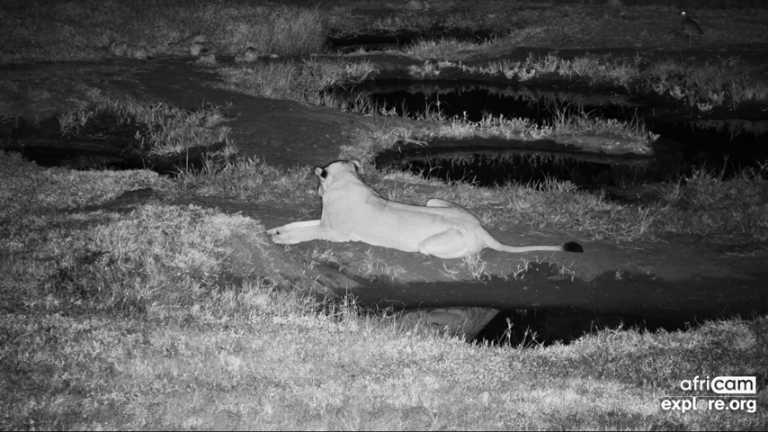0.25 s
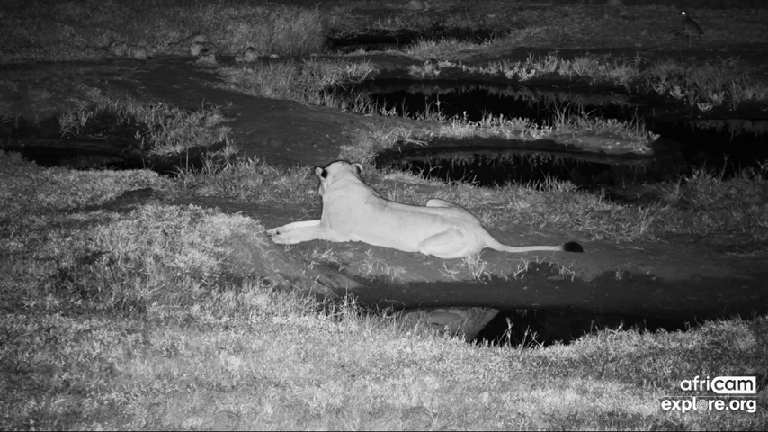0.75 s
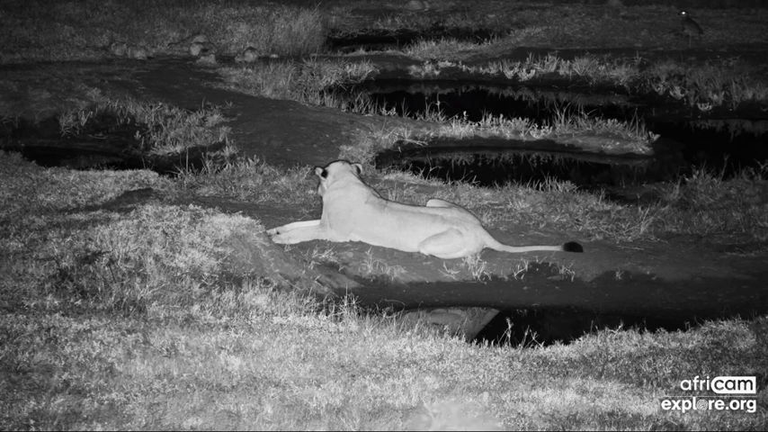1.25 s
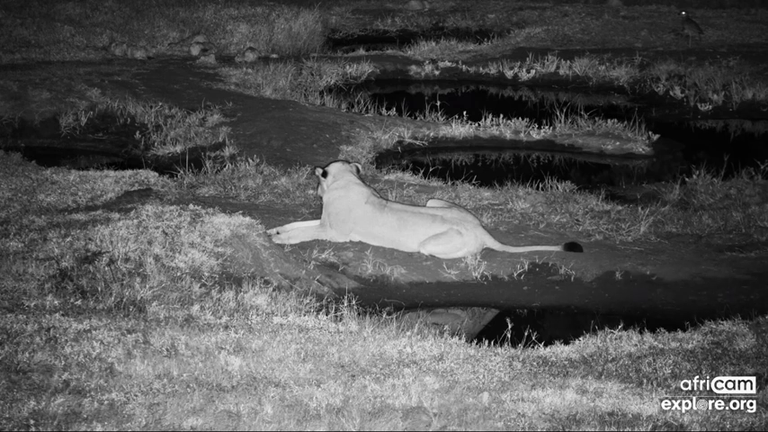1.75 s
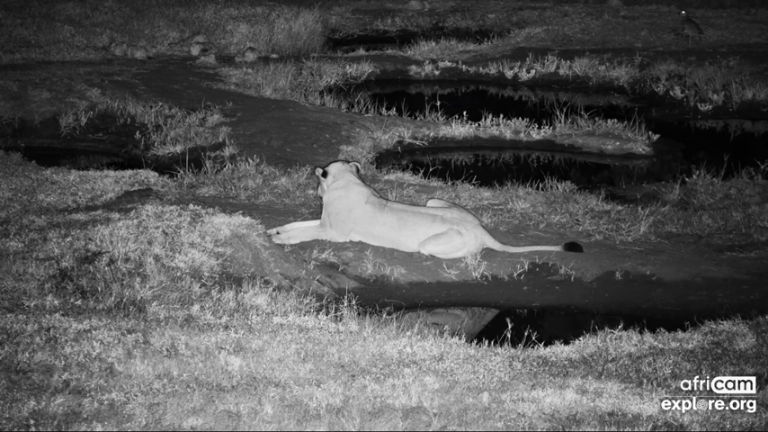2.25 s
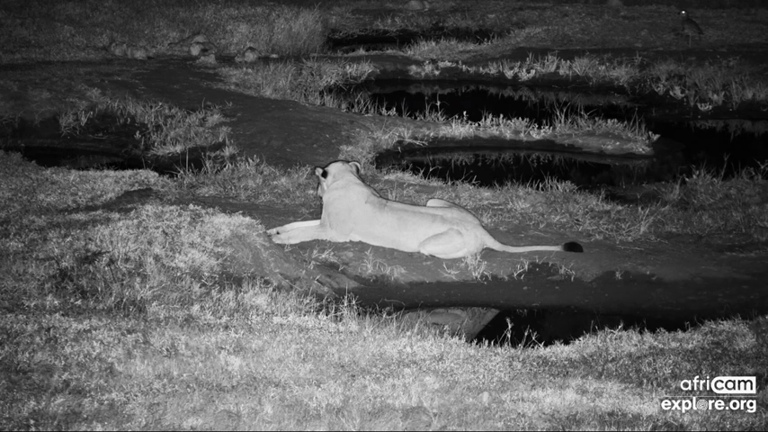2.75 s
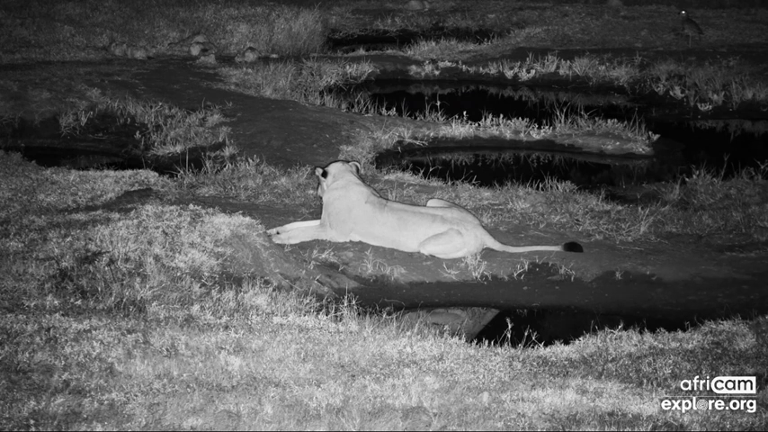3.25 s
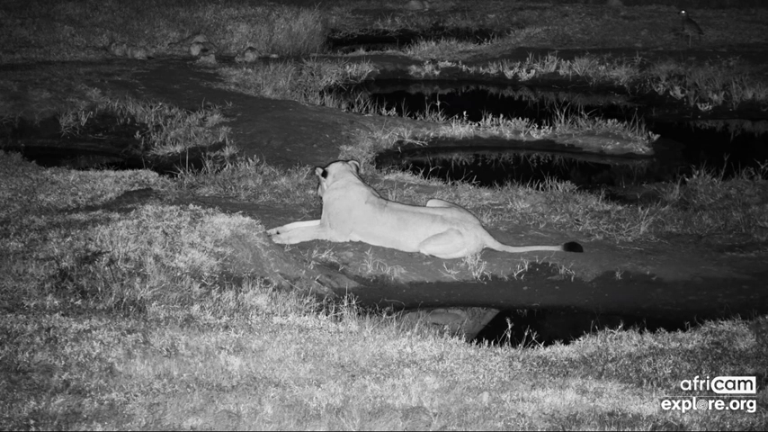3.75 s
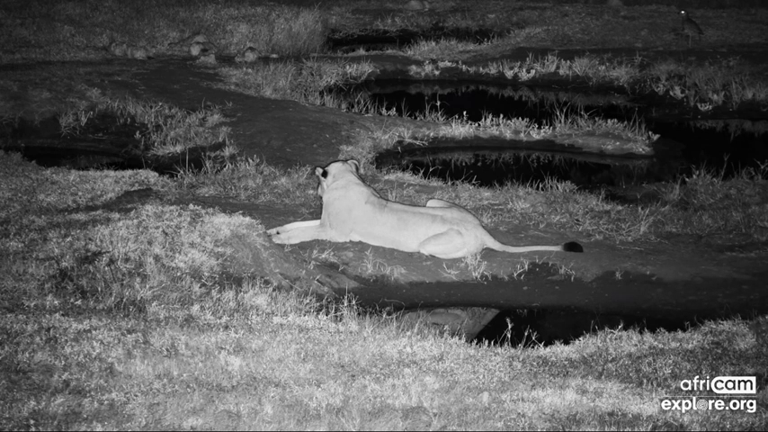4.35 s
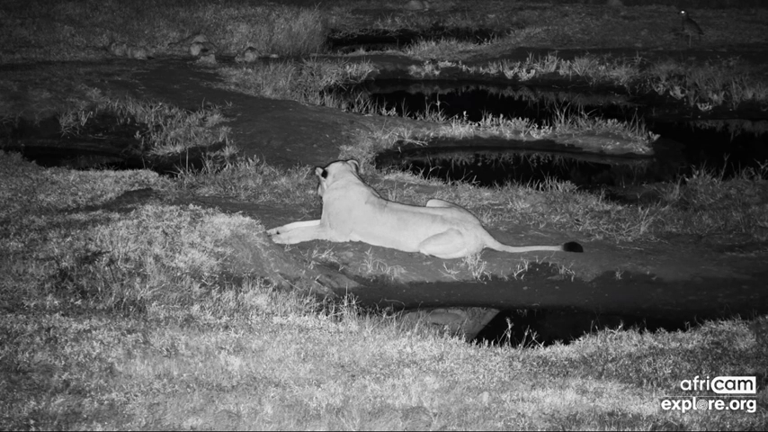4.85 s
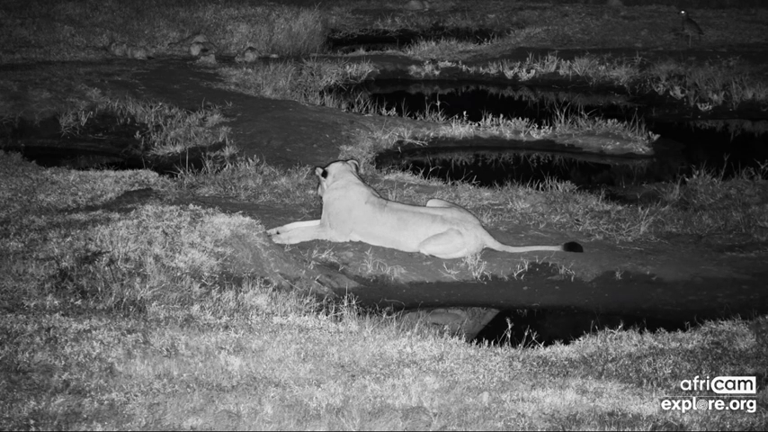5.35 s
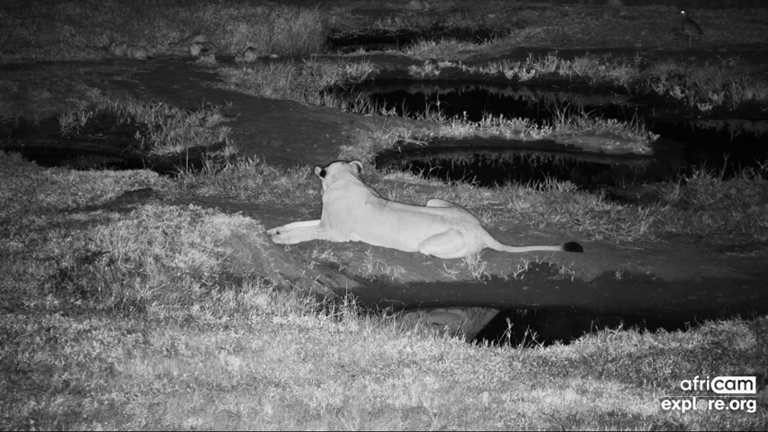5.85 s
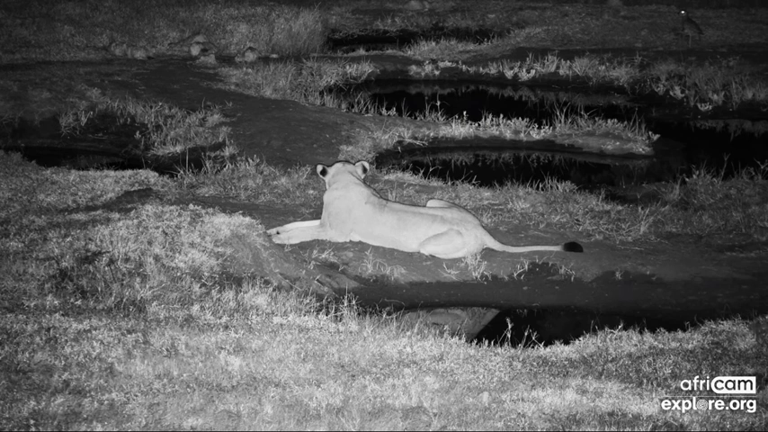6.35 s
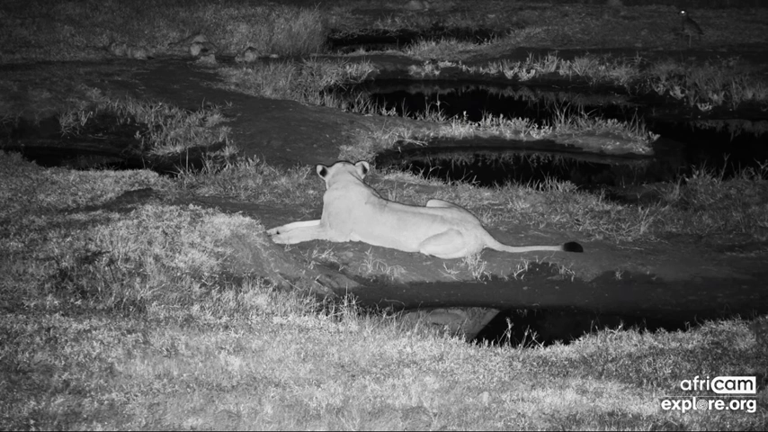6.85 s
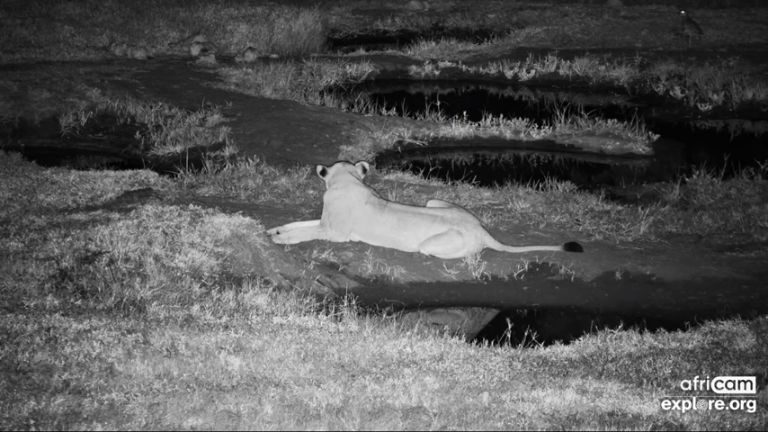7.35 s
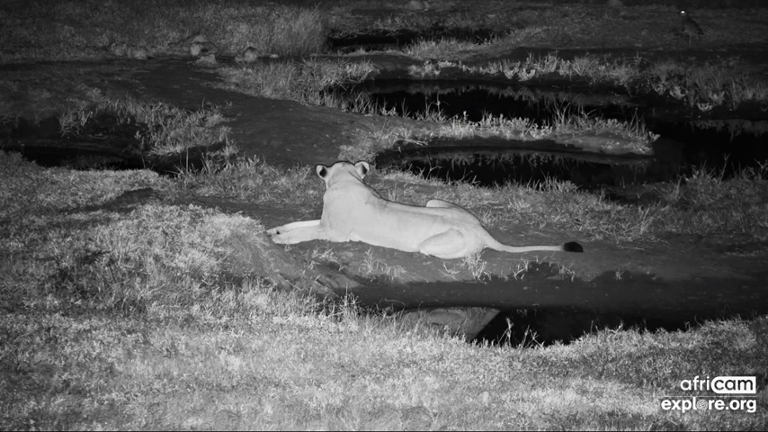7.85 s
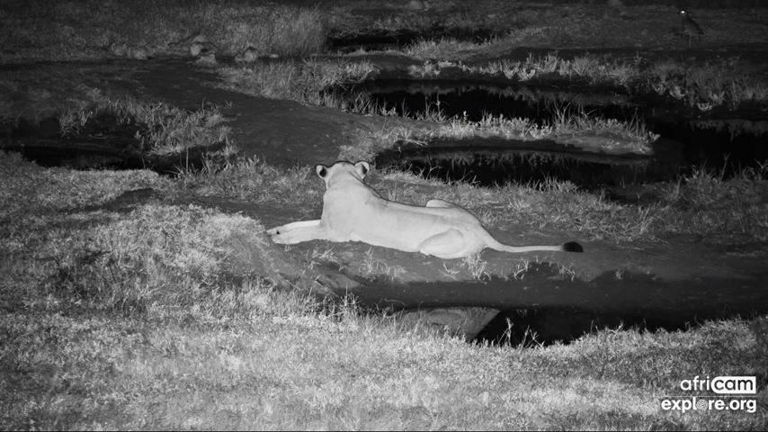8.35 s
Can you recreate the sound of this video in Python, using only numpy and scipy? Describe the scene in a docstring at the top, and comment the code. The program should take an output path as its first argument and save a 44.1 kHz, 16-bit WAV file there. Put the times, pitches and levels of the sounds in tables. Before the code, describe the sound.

A continuous outdoor night chorus: shimmering cricket trills, a low mole cricket buzz and blurred distant frogs, all steady and high. Close by, a cricket repeats little clusters of falling chirps, two or three clusters a second. Over it a reed frog gives five bright upward peeps, far louder than the rest, smeared lightly by reflections. Faint damped clicks and a single soft whoop answer. Fixed microphone, open wet ground, slight hiss and hum, no lion sound.

```python
"""Night at a waterhole, heard by one fixed microphone. A near cricket chirps in threes and fours from the start,
falling sine strokes blurred by reflections; a near reed frog gives five loud rising sine whistles with bank echoes.
Other frogs join with short damped clicks, and with the third whistle comes one bubbling whoop.
A lower cricket strokes in faint bouts. All through, reflected far frogs and crickets, trills and a mole cricket
blend into a high drone over shaped noise and a faint electric hum of steady sines."""
import sys
import numpy as np
from scipy import signal
from scipy.fft import rfft, irfft, next_fast_len
from scipy.io import wavfile

SR = 44100
rng = np.random.default_rng(int(sys.argv[2]) if len(sys.argv) > 2 else 0)


def pcm_store(signal):
    """Save signal as 16-bit PCM."""
    levels = np.round(np.clip(np.atleast_2d(signal), -1, 1) * 32767)
    wavfile.write(sys.argv[1], SR, levels.astype(np.int16).T)


N = 379701
T = np.arange(N) / SR


def undb(db):
    """Decibels to gain."""
    return 10 ** (np.asarray(db) / 20)


def level(x, db):
    """Set the rms level."""
    return x * undb(db) / np.sqrt(np.mean(x ** 2))


def tone(hz):
    """A sine that follows a pitch curve from a random starting phase."""
    cycles = np.cumsum(hz) / SR
    return np.sin(2 * np.pi * (cycles + rng.random()))


def ramp(u):
    """A smooth step from 0 to 1 as u goes from 0 to 1."""
    return np.sin(np.pi / 2 * np.clip(u, 0, 1)) ** 2


def walk(rate, size=N):
    """Smooth random wandering with a spread near 1: noise rolled off above about `rate` Hz."""
    padded = next_fast_len(size)
    spectrum = rfft(rng.standard_normal(padded))
    hz = np.arange(len(spectrum)) * SR / padded
    smooth = irfft(spectrum / (1 + (hz / rate) ** 4), padded)
    return level(smooth[:size], 0)


def add(out, s, sound):
    """Mix a sound in from time s on, cut at the ends of the scene."""
    start = int(s * SR)
    first, last = max(start, 0), min(start + len(sound), N)
    if last > first:
        out[first:last] += sound[first - start:last - start]


def scatter(x, t60):
    """Diffuse reflections: a decaying noise tail of unit energy, falling 60 dB in t60 seconds."""
    t = T[:SR]
    tail = rng.standard_normal(SR) * np.exp(-np.log(1000) * t / t60)
    return signal.fftconvolve(x, tail / np.linalg.norm(tail))[:N]


def whistle(swell_s, fade_s, shift_hz, noise_share, pace=1):
    """One rising note of a reed frog; the vocal sac swells to a peak and closes. A higher pace shortens it."""
    top_hz, climb_hz_per_s, levels_off_s, knee_hz = 3272, 8620, 0.0062, 62.6
    open_s, close_s = 0.026, 0.024
    crest_db, crest_s = 8, 0.014
    flutter_db, soft_flutter_db = 1.25, 1.5
    # time 0 is the loudest moment; the pitch climbs steadily and bends into its top just after it
    t = np.arange(-swell_s, fade_s, pace / SR)
    below_top = knee_hz * np.logaddexp(0, climb_hz_per_s * (levels_off_s - t) / knee_hz)
    crest = undb(crest_db / (1 + (t / crest_s) ** 2) - crest_db)
    shape = ramp((t + swell_s) / open_s) * crest * ramp((fade_s - t) / close_s)
    # the note is least steady where it is soft
    flutter = walk(90, size=8192)[:len(t)] * (flutter_db + soft_flutter_db * (1 - shape) ** 2)
    # a faint band of noise around 3.5 kHz follows the note's loudness
    noise_band = walk(360, size=8192)[:len(t)] * tone(np.full(len(t), 3490.))
    clean = tone(top_hz + shift_hz - below_top)
    return shape * undb(flutter) * (clean + noise_share * noise_band)


def near_frog():
    """Five whistles from the near bank, each sized by its own swell and fade."""
    # whistles: loudest moment t/s, peak level before flutter and noise band/dB,
    # swell before it/s, fade after it/s
    whistles = [(.220, -18.5, 0.051, 0.042), (2.029, -18.5, 0.049, 0.044), (3.755, -18, 0.05, 0.037),
                (6.179, -18, 0.048, 0.045), (7.602, -19, 0.051, 0.039)]
    out = np.zeros(N)
    for s, db, swell_s, fade_s in whistles:
        add(out, s - swell_s, undb(db) * whistle(swell_s, fade_s, 0, noise_share=0.11))
    return out


def banks(x):
    """Smeared echoes from the banks and a faint longer tail from the bush."""
    # bank echoes: delay/s, level/dB
    echoes = [(.085, -23.5), (.112, -33), (.245, -29)]
    out = undb(-20.5) * scatter(x, t60=0.32)
    for delay_s, db in echoes:
        add(out, delay_s, undb(db) * scatter(x, t60=0.15))
    return out


def bubbling_frog():
    """One fast upward whoop on an S-shaped glide, broken up by close reflections, then echoed across the water."""
    start_s, length_s, peak_db = 3.761, 0.04, -35.5
    low_hz, high_hz, turn_s, glide_s = 789, 2500, 0.021, 0.0066
    attack_s, fade_db_per_s, release_s = 0.0084, 380, 0.0097
    t = np.arange(0, length_s, 1 / SR)
    hz = low_hz + (high_hz - low_hz) / (1 + np.exp((turn_s - t) / glide_s))
    shape = ramp(t / attack_s) * ramp((length_s - t) / release_s)
    fade = undb(peak_db - fade_db_per_s * (t - attack_s))
    call = np.zeros(N)
    add(call, start_s, shape * fade * tone(hz))
    # close reflections: a short diffuse tail and one distinct repeat
    whoop = call + undb(-1) * scatter(call, t60=0.091)
    add(whoop, .0046, undb(-3) * call)
    # a long tail and three echoes from across the water
    out = whoop + undb(-17) * scatter(whoop, t60=1.1)
    for delay_s, echo_db in [(.060, -20), (.138, -26), (.210, -29)]:
        add(out, delay_s, undb(echo_db) * whoop)
    return out


def clicking_frogs(attack_s=0.0015, decay_s=.003):
    """Each click rings a heavily damped vocal sac at a wavering pitch; a weaker one usually follows."""
    # clicks: t/s, peak level of the direct click/dB, centre f/Hz, gap to the second click/s (0 for none)
    clicks = [(1.225, -44, 2940, 0.004), (1.360, -56, 2020, 0.013), (1.549, -48, 2470, 0.0072),
              (1.846, -41.5, 2870, 0.011), (1.877, -50, 2010, .012), (3.946, -45, 1990, 0.016),
              (4.683, -50, 1940, 0.014), (5.309, -53, 2300, .011), (5.732, -54, 1770, 0.0037),
              (6.436, -48.5, 1910, 0.011), (6.470, -52, 1890, 0.028), (6.509, -51, 1960, 0.0037),
              (6.850, -55, 1510, 0), (7.179, -52, 2500, 0.0036), (7.631, -39, 5220, 0)]
    out, t = np.zeros(N), T[:2048]
    shape = (1 - np.exp(-t / attack_s)) * np.exp(-t / decay_s)
    shape = shape / shape.max()
    for s, db, hz, gap_s in clicks:
        first, second = (undb(db) * shape * tone(hz + 170 * walk(400, size=2048)) for _ in range(2))
        add(out, s, first)
        if gap_s > 0:
            add(out, s + gap_s, undb(-2) * second)
    return out + undb(-10) * scatter(out, t60=.1)


def syllable(top_hz, fall_hz, length_s):
    """One wing stroke: the scraper slows along the file, so the pitch falls."""
    u = np.linspace(0, 1, int(length_s * SR))
    return np.sin(np.pi * u) * tone(top_hz - fall_hz * u ** 1.475)


def near_cricket(gap_s=.0353, stroke_s=.026):
    """Chirps of three or four uneven falling strokes, blurred by the grass around the singer."""
    # chirps: middle of the first stroke t/s, mean stroke level before the blur mix/dB, strokes
    chirps = [(0.083, -37.5, 3), (.588, -40.5, 4), (0.898, -38, 4), (1.236, -39, 4), (1.541, -40, 4),
              (1.893, -40.5, 4), (2.190, -41, 4), (2.492, -38, 4), (2.852, -39, 3), (3.331, -37.5, 4),
              (3.679, -39, 4), (4.007, -39.5, 4), (4.383, -39.5, 4), (4.712, -38, 4), (5.076, -37, 4),
              (5.516, -38.5, 4), (5.914, -39.5, 4), (6.198, -39, 4), (6.543, -38, 4), (7.118, -39, 4),
              (7.415, -38, 4), (7.783, -37, 4), (8.180, -37.5, 4), (8.508, -38.5, 4)]
    out = np.zeros(N)
    for s, db, strokes in chirps:
        for k, (pitch, force) in enumerate(rng.standard_normal((4, 2))[:strokes]):
            stroke = syllable(top_hz=5028 + 30 * pitch, fall_hz=666, length_s=stroke_s)
            add(out, s - stroke_s / 2 + k * gap_s, undb(db + 1.2 * force) * stroke)
    return .72 * out + .3 * scatter(out, t60=.07) + .44 * scatter(out, t60=.3)


def low_cricket():
    """Short bouts of faint, deeply falling strokes, uneven in strength and pace."""
    # bouts: start t/s, end t/s, stroke rate/Hz, mean stroke level before reflections/dB
    bouts = [(0.02, .2, 21, -54), (0.746, 1.1, 35, -65), (1.6, 2.0, 27, -60), (3.9, 4.25, 26, -62),
             (4.7, 5.05, 30, -67), (5.07, 5.42, 17, -55), (6.094, 6.45, 31.5, -57.5), (7.094, 7.5, 30, -58),
             (8.149, 8.6, 28, -57)]
    out = np.zeros(N)
    for start, end, rate, db in bouts:
        for s, (late, pitch, force) in zip(np.arange(start, end, 1 / rate), rng.standard_normal((16, 3))):
            stroke = syllable(top_hz=4400 + 70 * pitch, fall_hz=650, length_s=.024)
            add(out, s + .004 * late, undb(db + 3 * force) * stroke)
    return out + .8 * scatter(out, t60=.15)


def far_frogs(count=220):
    """Many reed frogs across the water; only reflections arrive, so the notes melt into a murmur."""
    spacing_s = N / SR / count
    out = np.zeros(N)
    for k, (late, pitch, near) in enumerate(rng.standard_normal((count, 3))):
        note = whistle(.045, .035, -30 + 110 * pitch, noise_share=.04, pace=2.5)
        add(out, (k + late / 2) * spacing_s, undb(2 * near) * note)
    return level(scatter(out, t60=1.0), -60.5)


def far_crickets(count=80):
    """Four-stroke chirps like the near cricket's, further off, arrive as a wash of reflections."""
    # far chorus loudness: t/s, level before a -0.5 dB trim/dB
    chorus = [(0.0, -54), (0.17, -54), (0.6, -55), (0.93, -58), (2.42, -50.5), (2.57, -51.5), (3.14, -54),
              (3.4, -52), (3.91, -53.5), (4.1, -55), (4.6, -52.5), (5.42, -52), (6.14, -51), (6.26, -52.5),
              (6.86, -56), (7.65, -50), (7.94, -56), (8.61, -53)]
    spacing_s = N / SR / count
    out = np.zeros(N)
    for k, (late, pitch, near) in enumerate(rng.standard_normal((count, 3))):
        stroke = undb(near) * syllable(top_hz=5020 + 70 * pitch, fall_hz=467, length_s=0.0222)
        for repeat in range(4):
            add(out, (k + late / 2) * spacing_s + repeat * .036, stroke)
    db = np.interp(T, *np.transpose(chorus))
    wash = scatter(out, t60=0.35)
    return level(wash, -0.5) * undb(db)


def trill(hz, rate, fall_hz, duty, jitter):
    """An unbroken train of falling wing strokes with wandering pitch; each sounds for `duty` of its cycle."""
    cycle = np.cumsum(rate * (1 + .005 * walk(3))) / SR % 1
    u = np.minimum(cycle / duty, 1)
    return np.sin(np.pi * u) * tone(hz * (1 + jitter * walk(80.1)) - fall_hz * (u - .5))


def trills():
    """Crickets all round the water, each swelling and fading on its own, part direct and part reflected."""
    # singers: mid-stroke f/Hz, stroke rate/Hz, fall in each stroke/Hz, rms level/dB,
    # diffuse share of the power (0-1), swell spread before a cap at 2/dB (a minus sign only flips it)
    singers = [(3130, 40, 410, -63.5, 0.78, 2), (4666, 28, 480, -56.5, 0.87, -4),
               (5206, 26, 520, -62, 1, 13), (5920, 35, 450, -60.5, 0, 2), (6200, 150, 920, -59.5, 0.7, 4),
               (6130, 75, 800, -59.5, 1, 2.5), (6334, 140, 1000, -58.5, 0, 8.5),
               (6970, 52, 1600, -63, 1, 3)]
    out = np.zeros(N)
    for hz, rate, fall_hz, db, diffuse, swell_db in singers:
        song = trill(hz, rate, fall_hz, duty=.7, jitter=.018)
        song = song * undb(min(swell_db, 2) * walk(0.46))
        direct = np.sqrt(1 - diffuse) * song
        reflected = np.sqrt(diffuse) * scatter(song, t60=0.081)
        out += level(direct + reflected, db)
    return out


def mole_cricket():
    """A low, even buzz from a burrow: a fast train of wing strokes with a short reflected tail."""
    song = trill(2480, 65.2, 230, duty=.72, jitter=.01)
    song = song + .4 * scatter(song, t60=.1)
    return level(song, -65.0)


def air():
    """Far insects and microphone hiss as shaped noise, plus steady sines for electric hum and a thin whine."""
    # noise spectrum: f/Hz, relative density level/dB
    hiss_curve = [(15, 15.5), (24, 19.5), (33, 17.5), (48, 12), (80, 8), (150, 3.5), (400, 0.5), (1000, 2),
                  (2000, 3.5), (2750, 7), (3800, 6.5), (5300, 12), (6200, 12), (7500, 3), (11000, 4),
                  (13600, 0.5)]
    # hum and whine: f/Hz, rms level/dB
    hum_lines = [(25, -73.5), (50, -75), (75, -79), (100, -82.5), (200, -86.5), (250, -87.5), (350, -84.5),
                 (450, -87.5), (920.6, -75)]
    hz, db = np.transpose(hiss_curve)
    bins = np.maximum(np.fft.rfftfreq(N, 1 / SR), 1)
    gain = undb(np.interp(np.log(bins), np.log(hz), db))
    hiss = irfft(rfft(rng.standard_normal(N)) * gain, N)
    hum = sum(level(tone(np.full(N, f)), line_db) for f, line_db in hum_lines)
    return level(hiss, -53) + hum


def scene():
    """All callers and the background reach one microphone, the same in both channels."""
    frog = near_frog()
    frogs = frog + banks(frog) + bubbling_frog() + clicking_frogs() + far_frogs()
    insects = near_cricket() + low_cricket() + far_crickets() + trills() + mole_cricket()
    mono = frogs + insects + air()
    return np.array([mono, mono])


def record(dry):
    """The recorder cuts the top steeply with an elliptic low-pass at 13.7 kHz."""
    low_pass = signal.ellip(12, .1, 70, 13700, fs=SR, output="sos")
    return signal.sosfilt(low_pass, dry)


dry = scene()
out = record(dry)
pcm_store(out)
```